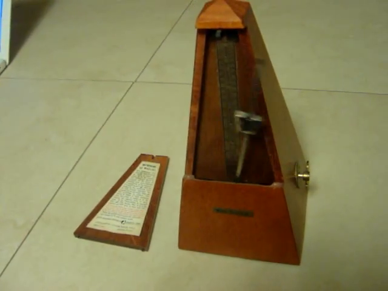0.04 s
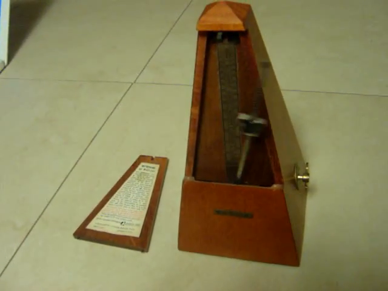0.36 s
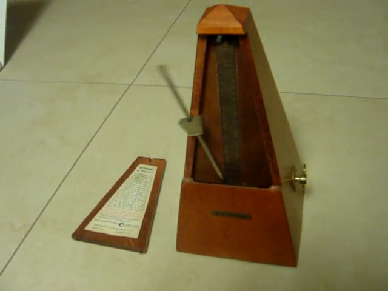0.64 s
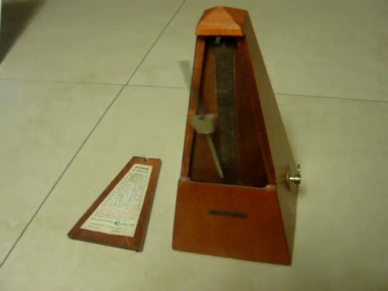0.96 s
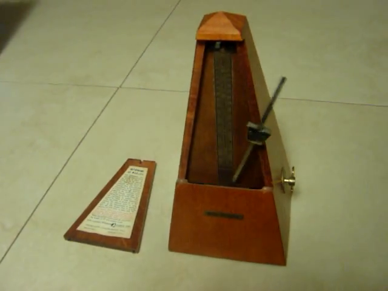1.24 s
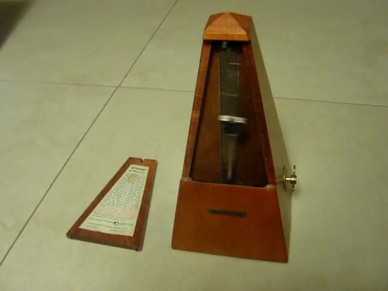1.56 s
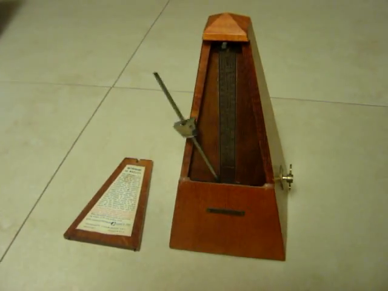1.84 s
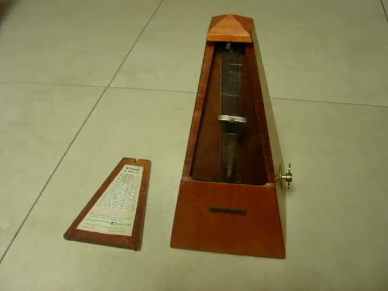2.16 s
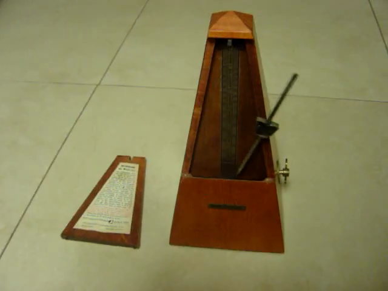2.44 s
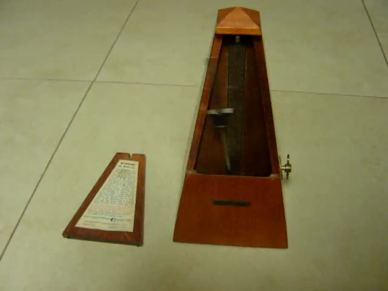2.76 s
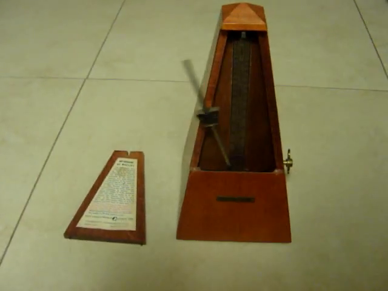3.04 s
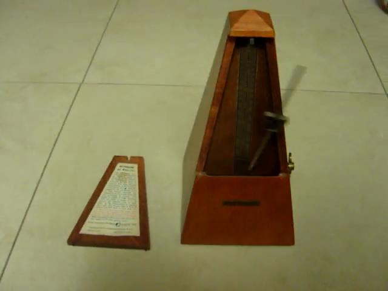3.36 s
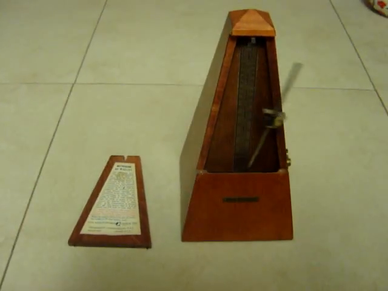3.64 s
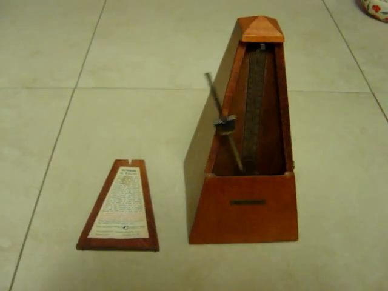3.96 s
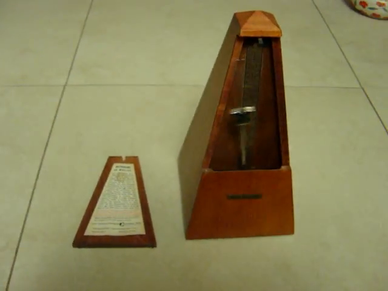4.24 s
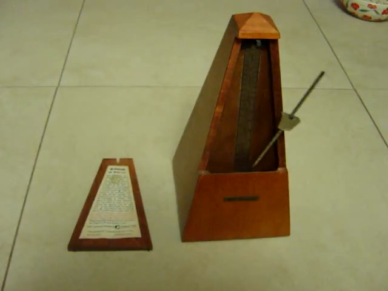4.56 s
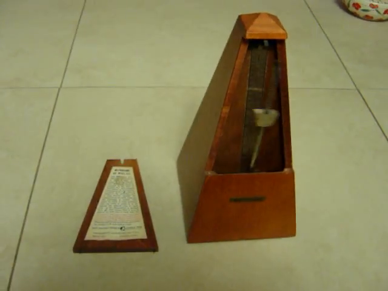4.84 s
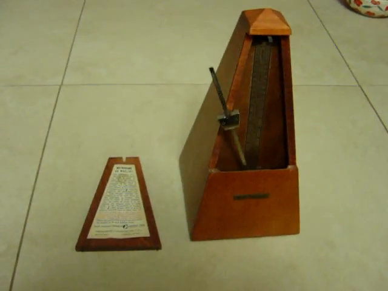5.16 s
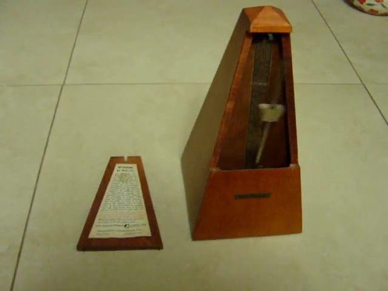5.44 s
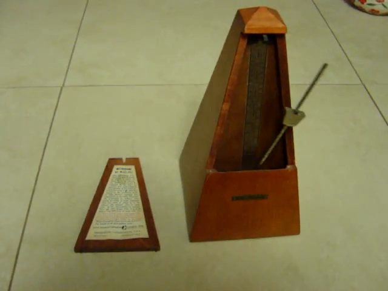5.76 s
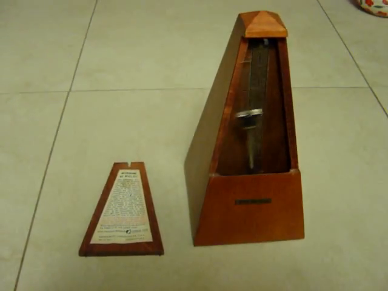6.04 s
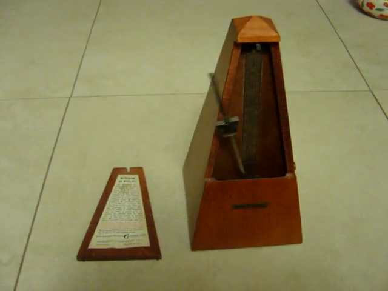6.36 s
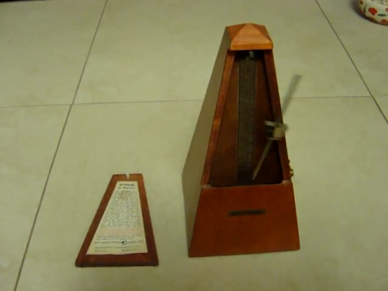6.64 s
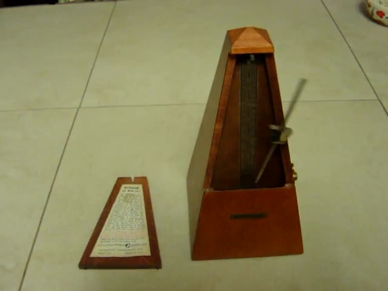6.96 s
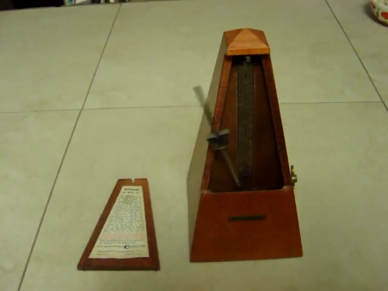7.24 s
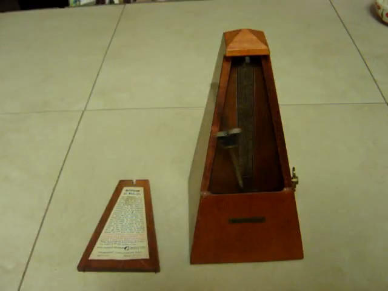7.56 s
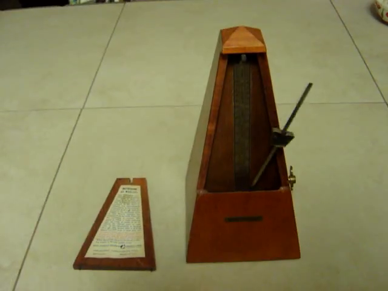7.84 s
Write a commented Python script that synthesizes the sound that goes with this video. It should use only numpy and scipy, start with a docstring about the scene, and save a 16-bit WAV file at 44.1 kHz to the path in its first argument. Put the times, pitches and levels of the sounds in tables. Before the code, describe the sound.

A wooden clockwork metronome ticks from start to finish at about 109 beats a minute, its left and right swings slightly lopsided. Each tick is a sharp, bright clack with a brief wooden ring and a short echo from a room with a tiled floor. The close, hand-held microphone picks up faint hiss and a low room hum throughout, and a few tiny handling clicks near the end.

```python
"""Wooden metronome in an echoing room

A clockwork metronome ticks on a tiled floor, about 109 beats a minute and slightly lopsided.
At each swing a gear tooth scrapes along its catch and strikes; the case rings and the room echoes.
A small hand-held microphone drifts round the case. It hisses, turns itself down on every tick
and picks up a few faint handling clicks."""
import sys
import numpy as np
from scipy import signal
from scipy.fft import rfft, irfft, next_fast_len
from scipy.io import wavfile
from scipy.ndimage import minimum_filter1d

SR = 44100
rng = np.random.default_rng(int(sys.argv[2]) if len(sys.argv) > 2 else 0)


def store_wav(level_fs):
    """Save 16-bit WAV to argv[1]."""
    pcm = np.round(np.clip(np.atleast_2d(level_fs), -1, 1) * 32767)
    wavfile.write(sys.argv[1], SR, pcm.T.astype(np.int16))


N = 347949

# When each tick starts, left and right swings in turn: start_s, force_db
TICK_TIMES = [(0.1332, 1), (0.6909, 0), (1.2317, 0), (1.7864, -1.5), (2.3222, -0.5), (2.8798, 0),
              (3.4155, 0), (3.9757, -1), (4.5086, -1), (5.0947, -0.5), (5.6222, 0.5), (6.195, -1),
              (6.7242, 0.5), (7.2919, -1.5), (7.8251, 0)]
# The tones of the case and clockwork: pitch_hz, level_db, fade_s, swing_db
# A fade is the time to fall by 60 dB. swing_db is added on one swing and taken off on the other.
CASE_TONES = [(633.5, -45, 0.096, 0), (705, -40.5, 0.075, -2), (846.4, -20, 0.047, 0.1),
              (1303, -39, 0.084, -0.5), (1546.6, -28, 0.059, -1), (1688, -34.5, .045, -0.5),
              (1788, -37, 0.086, 1.5), (1918, -38.5, 0.039, -1), (2010, -35, 0.064, -1.5),
              (2594, -31.5, 0.042, -4.5), (2630, -27.5, 0.047, 3), (2790, -35, 0.061, 0),
              (3332, -11.5, 0.021, -0.5), (3498, -12, 0.014, -0.5), (3700, -12, 0.017, 0),
              (4285, -33.5, 0.025, -4.5), (4707, -15.5, 0.032, 0.5), (4812, -15, 0.024, -1),
              (4930, -12, 0.018, -4), (5070, -21.5, .023, 8), (5734, -23, 0.036, 1), (6310, -36, .02, -5),
              (6530, -29.5, 0.014, 0.5), (7105, -27, 0.035, -5.5), (7640, -22.5, .021, 3.5),
              (7940, -21.5, 0.022, 3), (8470, -30, 0.036, -0.5), (9270, -27, .012, -2.5),
              (9880, -28, 0.02, 0)]
# How bright the case sounds as the microphone drifts round it: time_s, tilt_db_per_octave
BRIGHTNESS = [(0.1, 1), (3.4, -0.5), (5.6, 0.16), (7.8, -0.6)]
# The tone colour of the room's echo: pitch_hz, level_db
ECHO_COLOUR = [(100, -42), (550, -12.5), (850, -8), (1100, -3), (1550, 0), (2250, 1), (2650, 5), (3500, 5),
               (4300, 5.5), (4800, 10.5), (5300, 7.5), (6300, 3.5), (7600, 6), (8700, 0), (10000, -8)]
# How long the echo lasts, from low to high: pitch_hz, fade_s
ECHO_FADES = [(300, 1), (850, 0.34), (1600, 0.46), (3500, 0.43), (5000, 0.42), (7500, 0.38), (10000, 0.35)]
# Handling clicks, each a dull knock and a sharp snap: start_s, knock_db, snap_db
HAND_CLICKS = [(6, -38.5, -56), (6.4935, -39.5, -59), (6.5400, -39.5, -45), (6.6551, -34.5, -50),
               (6.9010, -41, -23.5), (6.9664, -34.5, -60), (7.6316, -40, -64)]
# The tone colour of the room's murmur and the microphone's hiss: pitch_hz, level_db
NOISE_COLOUR = [(25, -15), (75, -12), (125, -10.5), (200, 0), (330, -2.5), (450, -1.5), (630, 2.5),
                (780, -4), (950, -3), (1250, -12.5), (1650, -12), (2200, -15.5), (4000, -20),
                (10000, -24.5)]
# Droning tones in the murmur: pitch_hz, half_width_hz, level_db
DRONE_TONES = [(123.8, 3.8, -66), (384.5, 24, -59), (589.3, 21, -56)]


def metronome(strike_db=13.5, strike_delay_s=.00065, bounce_db=-9, bounce_s=.0055):
    """At each swing a brief scrape leads into a strike and one bounce. Echoes follow."""
    out, t = np.zeros(N), seconds(.1)
    for k, (start_s, force_db) in enumerate(TICK_TIMES):
        hit_s = start_s + strike_delay_s
        force = from_db(strike_db + force_db)
        tilt_db = np.interp(hit_s, *np.transpose(BRIGHTNESS))
        strike = force * (case_ring(t, (-1) ** k, tilt_db) + steel_crack(t) - low_thump(t))
        scrape = tooth_scrape()
        bounce = from_db(bounce_db) * band(strike, 4200, 8700)
        add(out, hit_s - len(scrape) / SR, scrape)
        add(out, hit_s, strike)
        add(out, hit_s + bounce_s * rng.uniform(.76, .83), bounce)
        add(out, hit_s, force * near_echoes(t))
        add(out, hit_s, sum(room_echo(part) for part in spread_into_room(strike)))
    return out


def case_ring(t, swing, tilt_db, vary_db=.8, detune=.001, rise_cycles=.7):
    """One strike rings every tone of the case; left and right swings favour different ones."""
    hz, level_db, fade_s, swing_db = np.transpose(CASE_TONES)[:, :, None]
    level_luck, pitch_luck = rng.standard_normal((2, len(hz), 1))
    brightness_db = tilt_db * np.log2(hz / 4500)
    strength = from_db(level_db + swing * swing_db + brightness_db + vary_db * level_luck)
    direction = (-1) ** np.arange(len(hz))[:, None]  # neighbouring tones start opposite ways
    cycles = hz * (1 + detune * pitch_luck) * t
    swell = 1 - np.exp(-cycles / rise_cycles)
    return np.sum(strength * direction * fade(t, fade_s) * swell * np.cos(2 * np.pi * cycles), axis=0)


def steel_crack(t, snap_db=-8, snap_fade_s=.006, chatter_db=-22, chatter_fade_s=.019):
    """Steel snaps onto steel and chatters for a few milliseconds."""
    contact = from_db(snap_db) * fade(t, snap_fade_s) + from_db(chatter_db) * fade(t, chatter_fade_s)
    return band(rng.standard_normal(len(t)) * contact, 2700, 7500)


def low_thump(t, level_db=-17, fade_s=.0013, top_hz=550):
    """A short, low thump comes with each tick."""
    keep_lows = signal.butter(2, top_hz, fs=SR, output="sos")
    return from_db(level_db) * signal.sosfilt(keep_lows, fade(t, fade_s))


def tooth_scrape(level_db=-21, length_s=.0021):
    """The tooth scrapes along its catch, growing louder right up to the strike."""
    t = seconds(length_s)
    return from_db(level_db) * band(rng.standard_normal(len(t)) * np.sqrt(t / length_s), 2600, 7500)


def steel_ring(pitch_hz=8980, level_db=-60, fade_s=1.8, vary_db=2):
    """Every second strike leaves a steel part ringing thinly until the pendulum swings back."""
    out, t = np.zeros(N), seconds(.5)
    damping = np.interp(t, [.36, .46], [1, 0])
    tone = np.sin(2 * np.pi * pitch_hz * t) * fade(t, fade_s) * damping
    for start_s, force_db in TICK_TIMES[1::2]:
        add(out, start_s, from_db(level_db + force_db + vary_db * rng.standard_normal()) * tone)
    return out


def near_echoes(t, level_db=-36, build_s=.0067, fade_s=.091):
    """The clack scatters early off the floor and nearby things."""
    scatter = unit_level(band(rng.standard_normal(len(t)), 3100, 4000))
    swell = 1 - np.exp(-(t / build_s) ** 2)
    return from_db(level_db) * scatter * swell * fade(t, fade_s)


def spread_into_room(strike, panel_db=-3, whole_db=-21, click_db=9):
    """Heard from all sides, the wooden panels' low tones survive; the high ones blur into a click."""
    panels = from_db(panel_db) * band(strike, 280, 1500) + from_db(whole_db) * strike
    click = from_db(click_db) * band(signal.unit_impulse(len(strike)), 1900, 14000)
    return panels, click


def room_echo(sound, echo_db=-34, build_s=.029):
    """Many reflections build up and die away, different each time because the microphone moves."""
    t = seconds(.7)
    hz = np.arange(len(t) // 2 + 1) * SR / len(t)
    spectrum = rfft(rng.standard_normal(len(t))) * from_db(at_hz(ECHO_COLOUR, hz))
    tail = np.zeros(len(t))
    for centre_hz, fade_s in ECHO_FADES:  # each range of pitches fades at its own speed
        share = at_hz([(f, float(f == centre_hz)) for f, _ in ECHO_FADES], hz)
        tail += irfft(spectrum * share, len(t)) * fade(t, fade_s)
    swell = 1 - np.exp(-(t / build_s) ** 2)
    return from_db(echo_db) * signal.fftconvolve(sound, tail * swell)


def handling_clicks(knock_hz=1740, knock_fade_s=.019, snap_fade_s=.017):
    """Plastic clicks faintly in the hand, close to the microphone."""
    out, t = np.zeros(N), seconds(.05)
    knock = np.sin(2 * np.pi * knock_hz * t) * fade(t, knock_fade_s)
    for start_s, knock_db, snap_db in HAND_CLICKS:
        snap = band(rng.standard_normal(len(t)) * fade(t, snap_fade_s), 1800, 10000)
        add(out, start_s, from_db(knock_db) * knock + from_db(snap_db) * snap)
    return out


def murmur_and_hiss(noise_db=-49.5):
    """The room murmurs steadily, with a few droning tones, and the microphone hisses."""
    size = next_fast_len(N)
    hz = np.arange(size // 2 + 1) * SR / size

    def noise(colour):
        return unit_level(irfft(rfft(rng.standard_normal(size)) * colour, size)[:N])

    drone = np.zeros(N)
    for pitch_hz, half_width_hz, level_db in DRONE_TONES:
        peak = 1 / (1 + ((hz - pitch_hz) / half_width_hz) ** 2)
        drone += from_db(level_db) * noise(peak)
    return from_db(noise_db) * noise(from_db(at_hz(NOISE_COLOUR, hz))) + drone


def auto_volume(x, limit_db=-5, recover_db_per_s=560, react_s=.00099, leak_db=-61, hold_samples=330):
    """Loud peaks turn the volume down; it waits briefly, then climbs back."""
    excess_db = np.maximum(20 * np.log10(np.abs(x) + 1e-9) - limit_db, 0)
    held_db = -minimum_filter1d(-excess_db, hold_samples, origin=(hold_samples - 1) // 2)
    ramp_db = recover_db_per_s * np.arange(N) / SR
    recovering_db = np.maximum.accumulate(held_db + ramp_db, axis=-1) - ramp_db
    smoothing = np.exp(-1 / (react_s * SR))
    dip_db = signal.lfilter([1 - smoothing], [1, -smoothing], recovering_db)
    leak = from_db(leak_db) * dip_db  # a little of the control voltage gets into the sound
    return x * from_db(-dip_db) + leak


def from_db(db):
    """Turn decibels into a number to multiply by."""
    return 10 ** (np.asarray(db) / 20)


def unit_level(x):
    """Scale a sound to an average (rms) level of one."""
    return x / np.sqrt(np.mean(x ** 2) + 1e-20)


def at_hz(points, hz):
    """Read between the rows of a table, spacing octaves evenly."""
    pitches, values = np.transpose(points)
    return np.interp(np.log(np.maximum(hz, 1)), np.log(pitches), values)


def seconds(length_s):
    """The time of each sample."""
    return np.arange(int(length_s * SR)) / SR


def fade(t, fade_s):
    """Die away by 60 dB every fade_s seconds."""
    return np.exp(-np.log(1000) * t / fade_s)


def band(x, low_hz, high_hz):
    """Keep the pitches between two limits."""
    return signal.sosfilt(signal.butter(2, [low_hz, high_hz], "band", fs=SR, output="sos"), x)


def add(track, start_s, sound):
    """Mix a sound in at the given time."""
    start = round(start_s * SR)
    track[start:start + len(sound)] += sound[:N - start]


def scene():
    """Mix all the sounds into one channel."""
    return (metronome() + steel_ring() + handling_clicks() + murmur_and_hiss())[None]


def record(dry, overload=.7, ceiling=.82, low_hz=5, high_hz=10000, top_cut_hz=16500):
    """The microphone's circuits turn down loud ticks, round off their peaks and cut the highest treble."""
    drift_filter = signal.butter(1, low_hz, "high", fs=SR, output="sos")
    treble_filter = signal.ellip(10, .3, 70, high_hz, fs=SR, output="sos")
    top_filter = signal.cheby2(12, 40, top_cut_hz, fs=SR, output="sos")
    centred = signal.sosfilt(drift_filter, auto_volume(dry))
    rounded = overload * np.tanh(centred / overload)
    dulled = signal.sosfilt(treble_filter, rounded)
    limited = dulled / (1 + (dulled / ceiling) ** 8) ** (1 / 8)
    return signal.sosfiltfilt(top_filter, limited)


dry = scene()
out = record(dry)
store_wav(out)
```